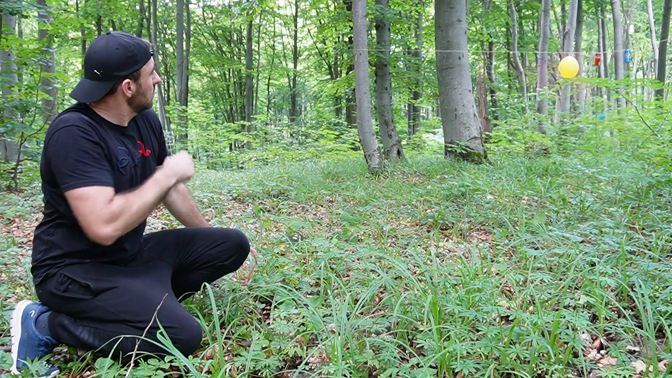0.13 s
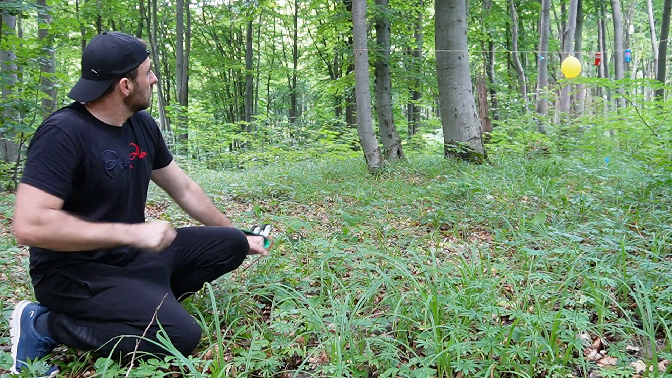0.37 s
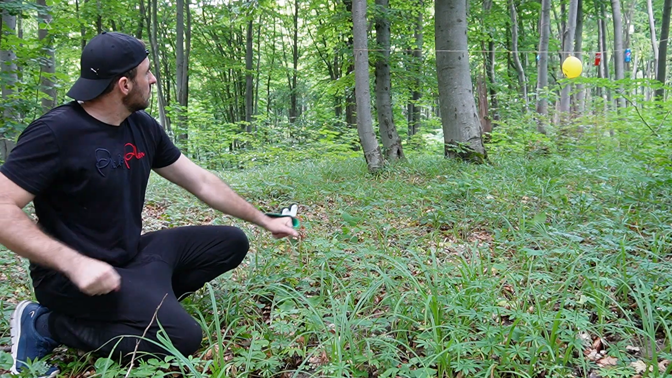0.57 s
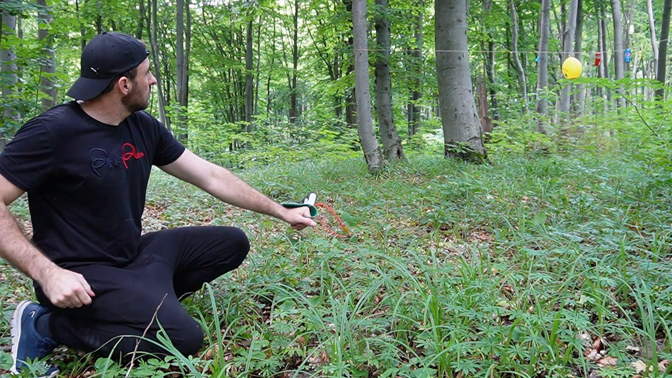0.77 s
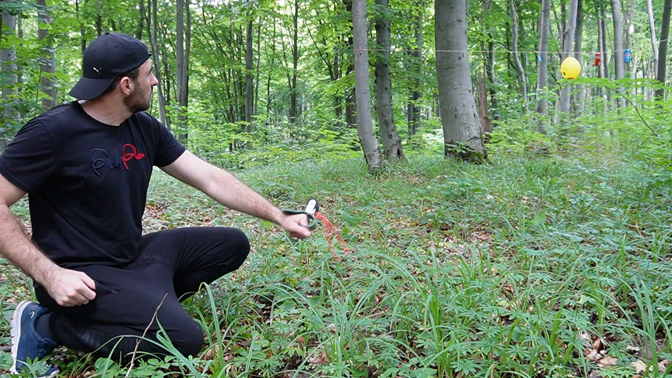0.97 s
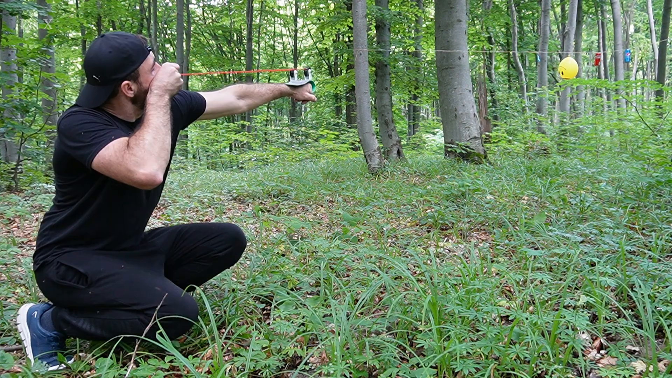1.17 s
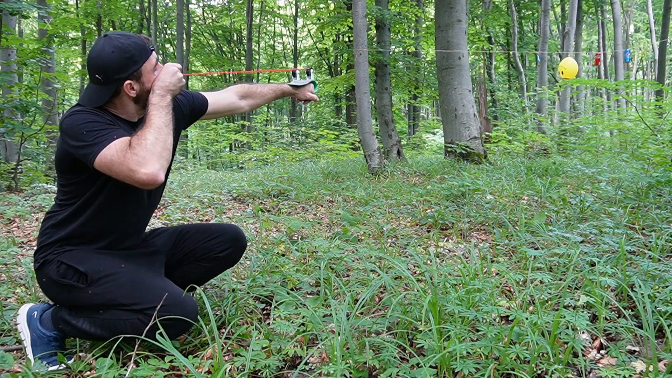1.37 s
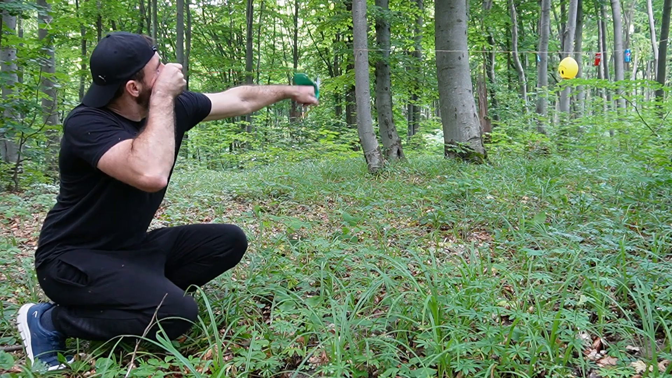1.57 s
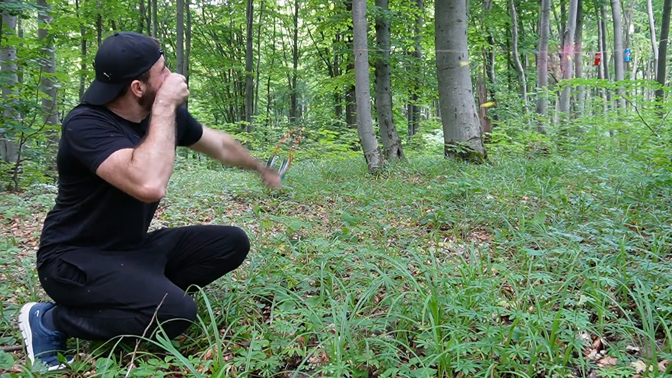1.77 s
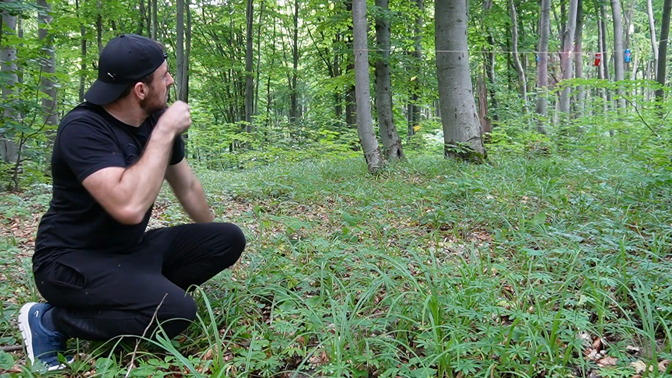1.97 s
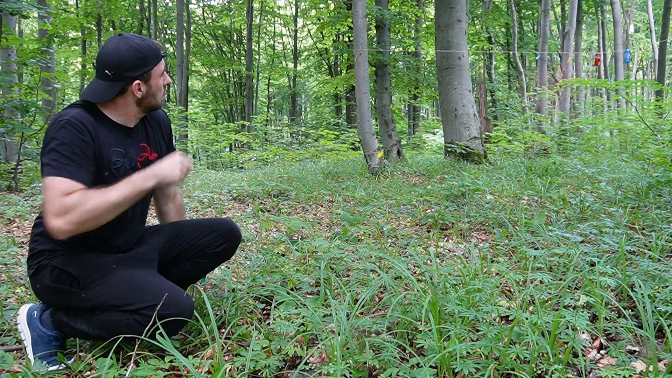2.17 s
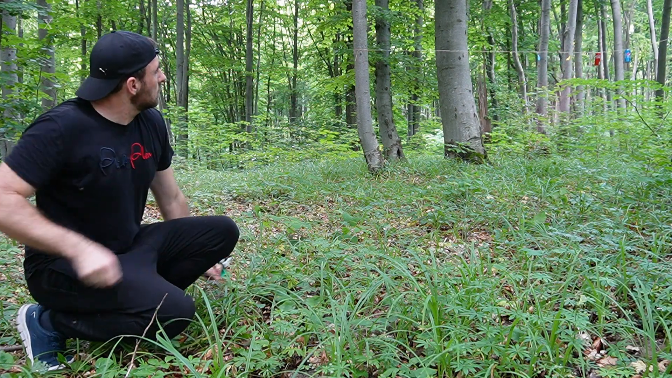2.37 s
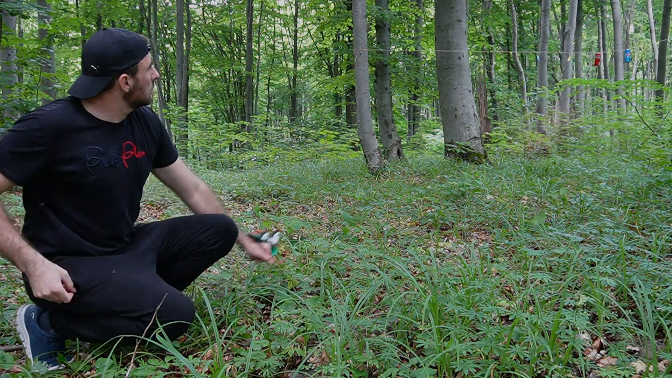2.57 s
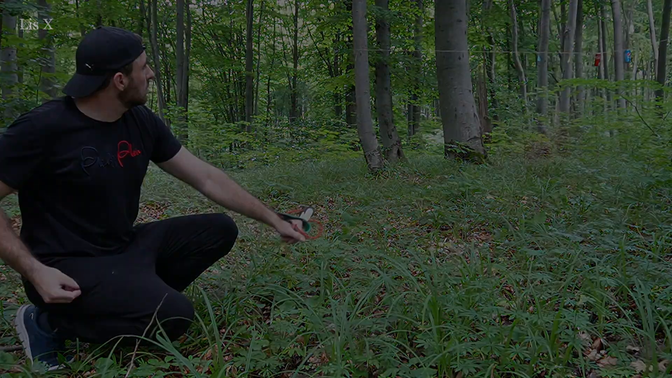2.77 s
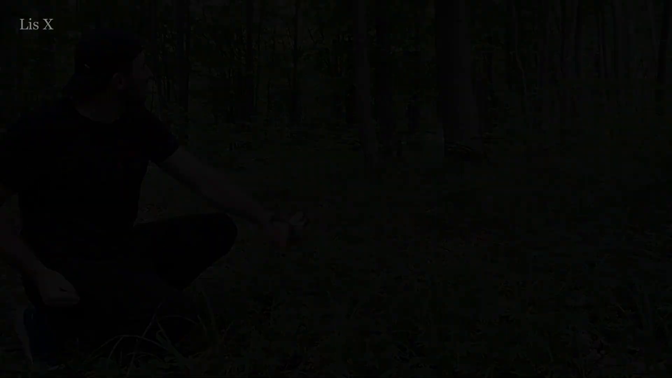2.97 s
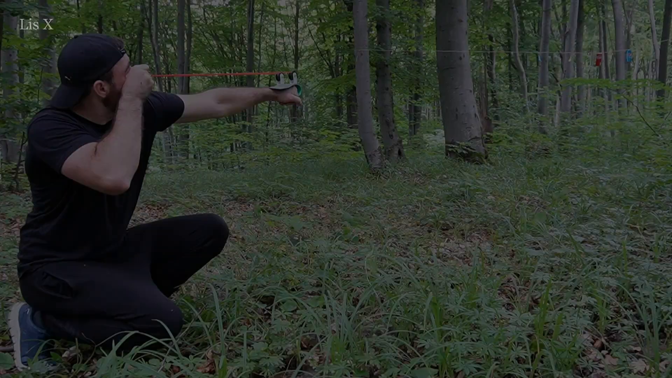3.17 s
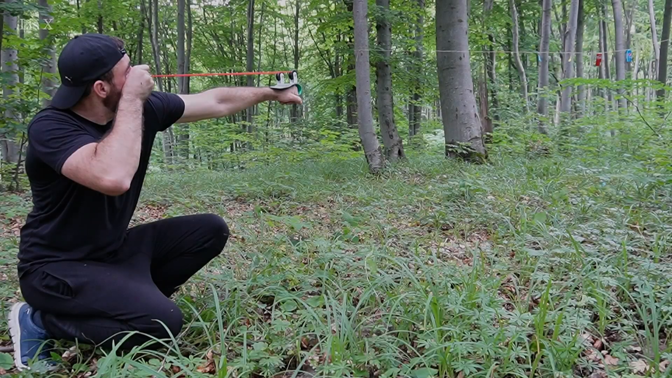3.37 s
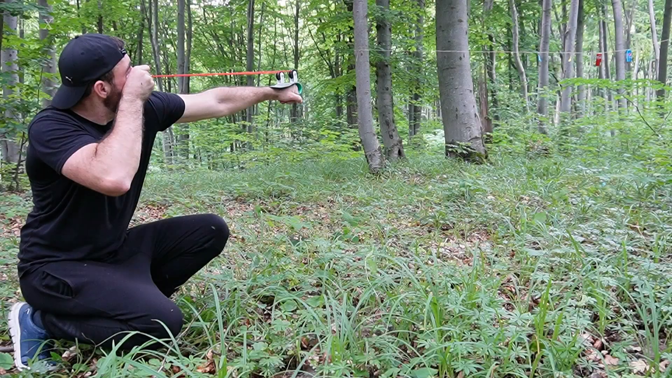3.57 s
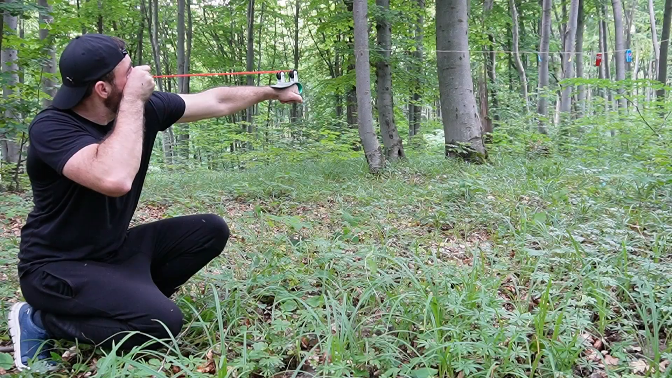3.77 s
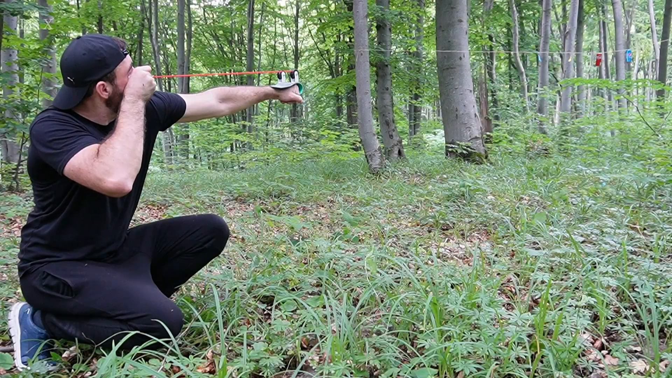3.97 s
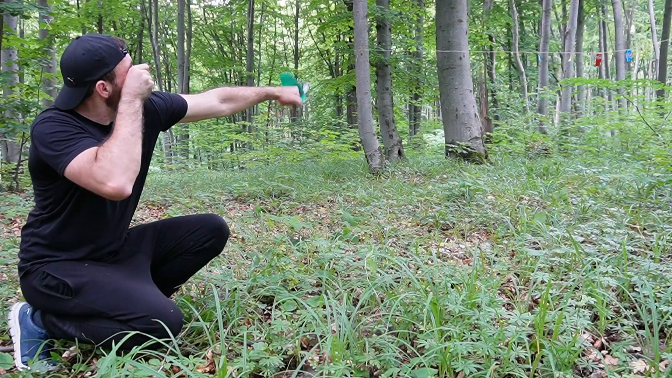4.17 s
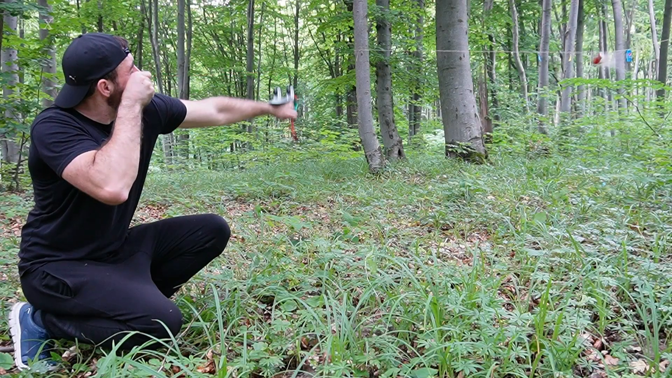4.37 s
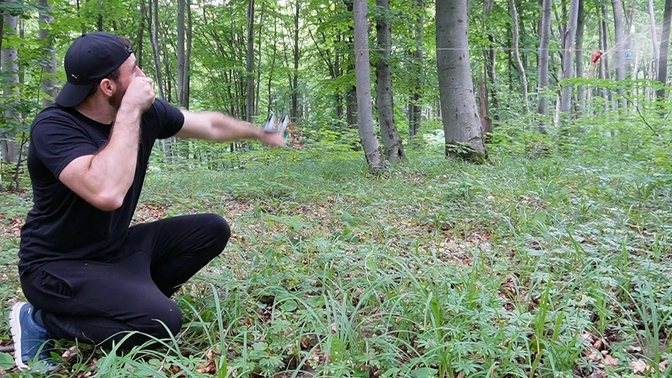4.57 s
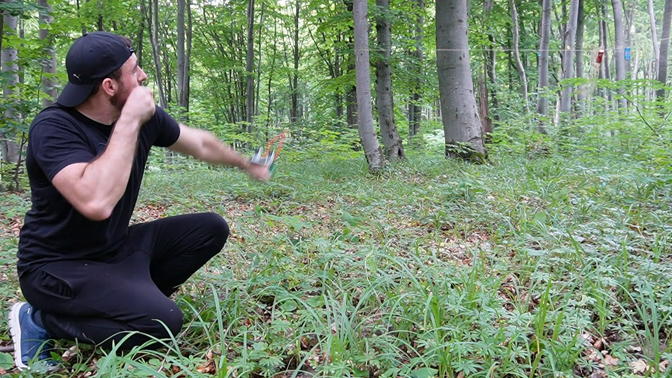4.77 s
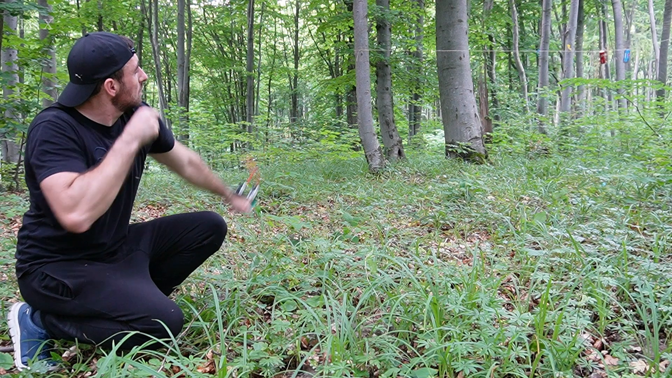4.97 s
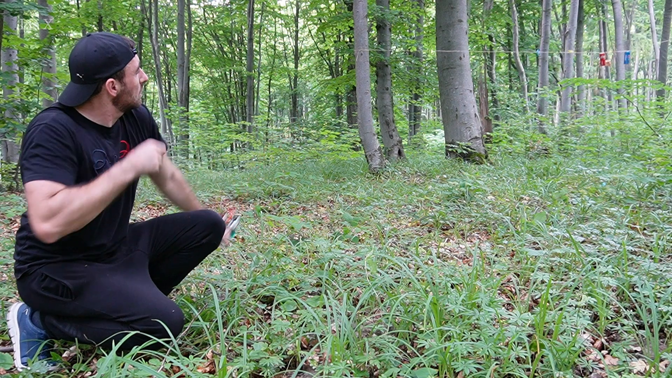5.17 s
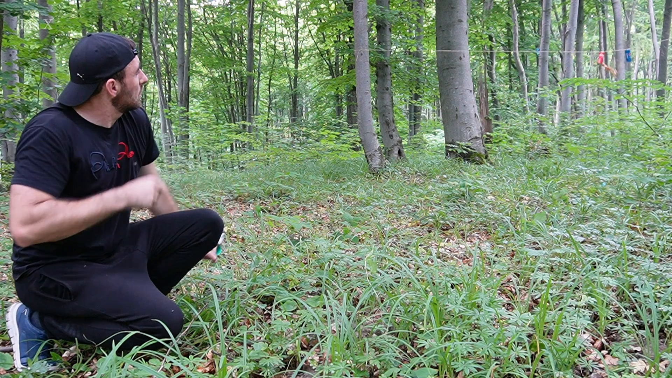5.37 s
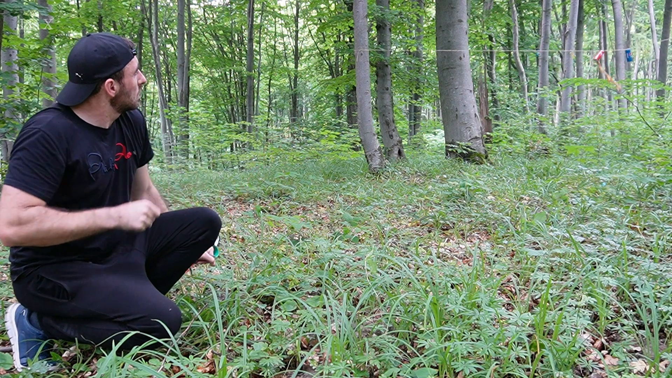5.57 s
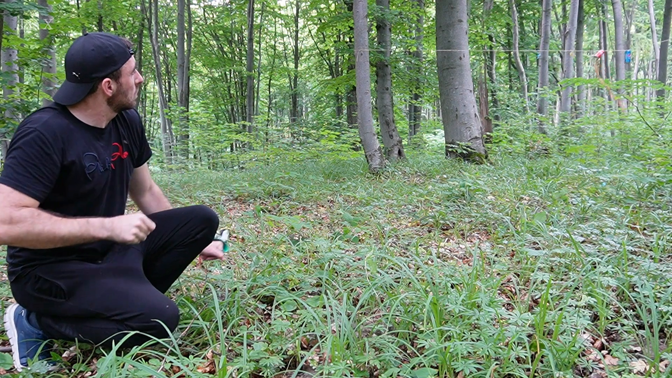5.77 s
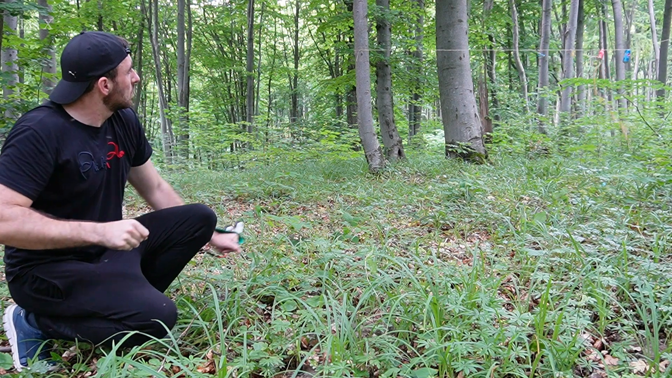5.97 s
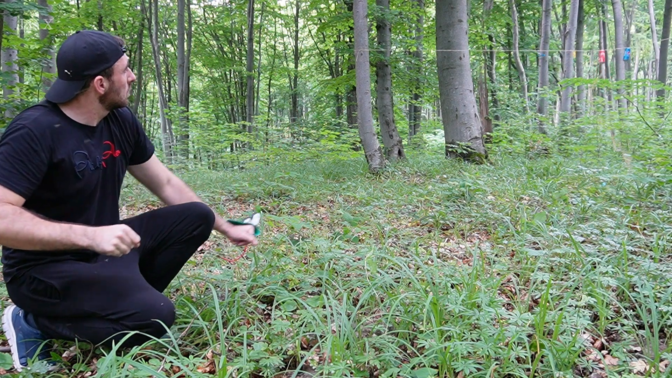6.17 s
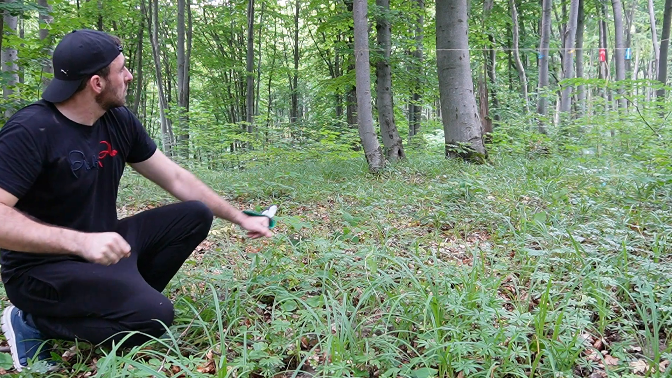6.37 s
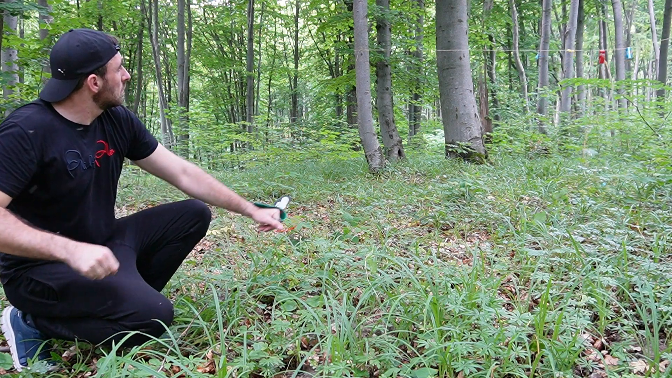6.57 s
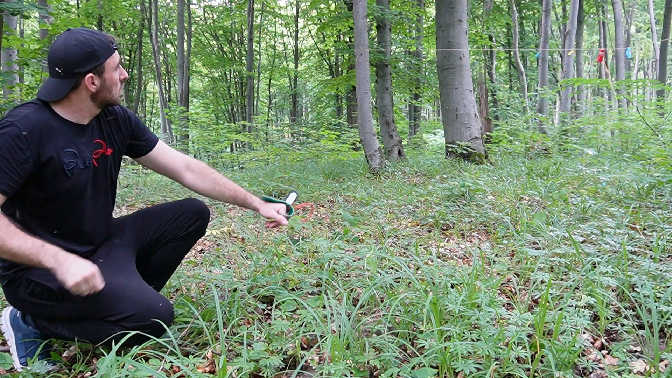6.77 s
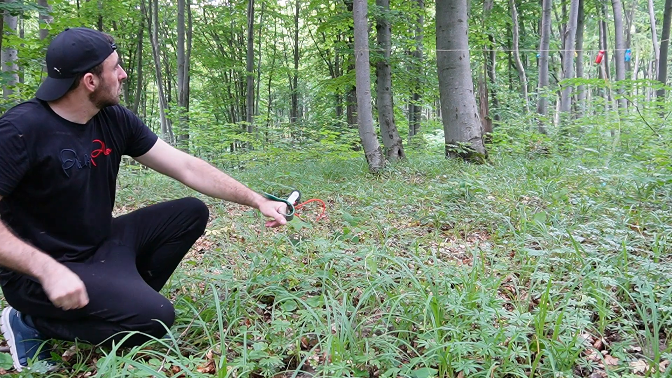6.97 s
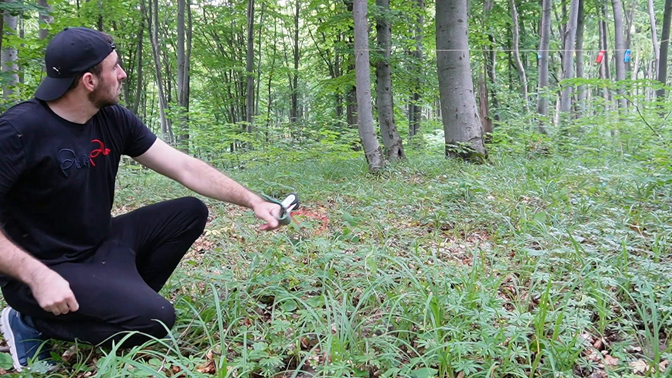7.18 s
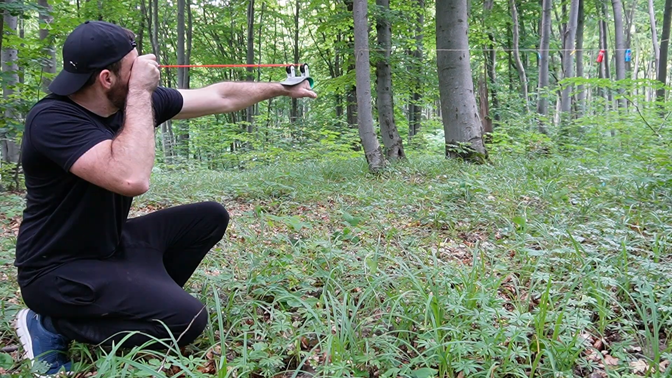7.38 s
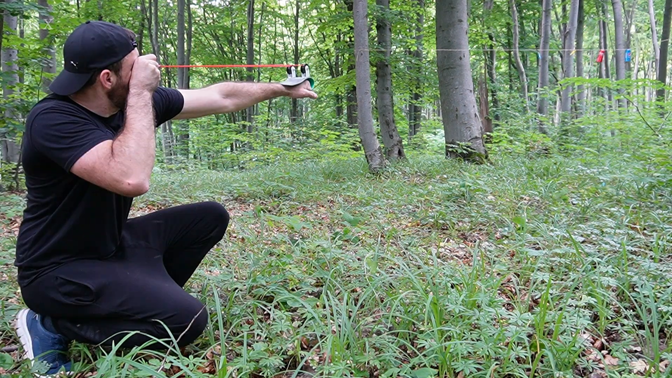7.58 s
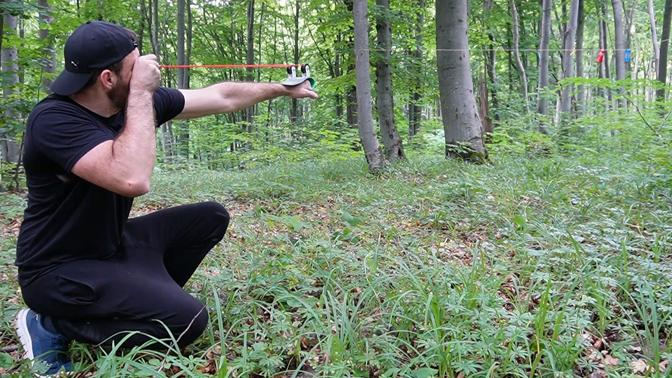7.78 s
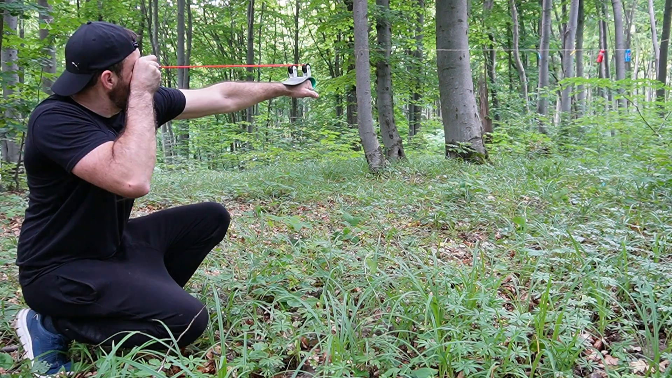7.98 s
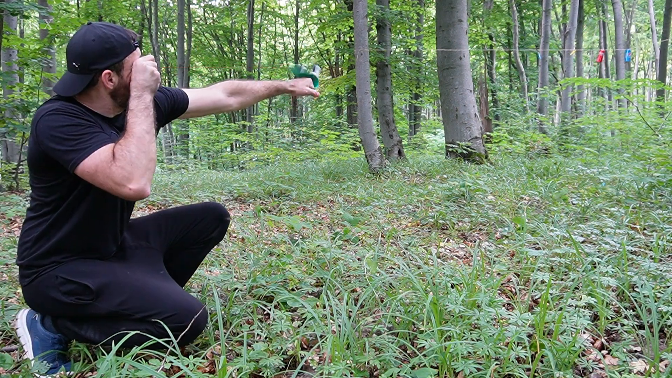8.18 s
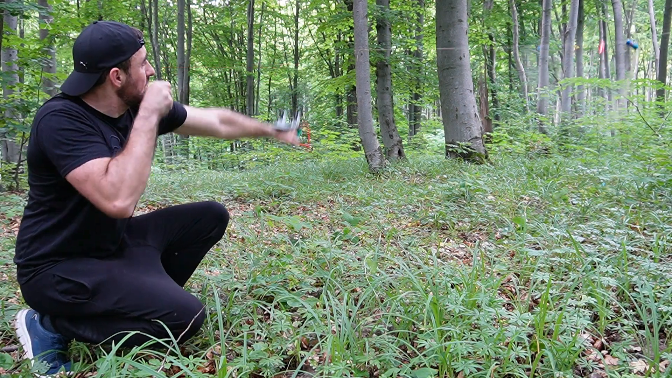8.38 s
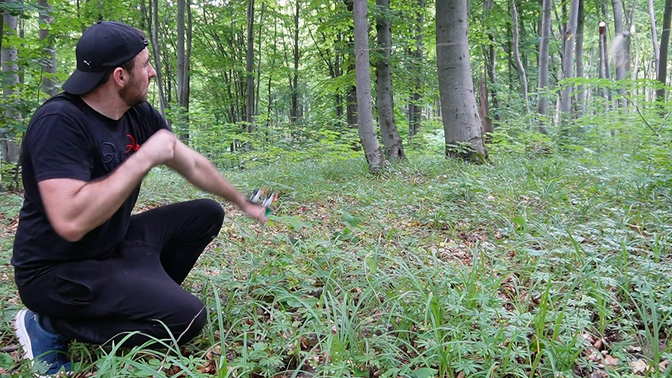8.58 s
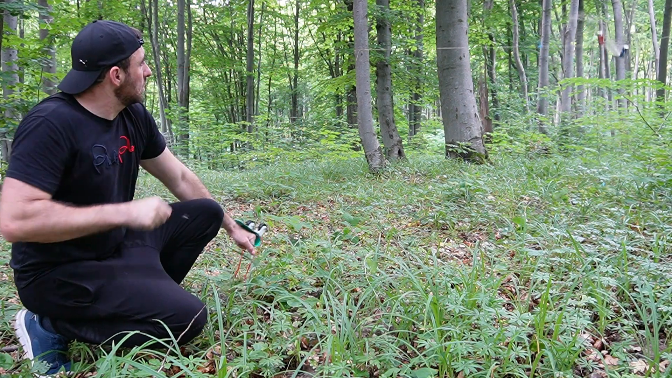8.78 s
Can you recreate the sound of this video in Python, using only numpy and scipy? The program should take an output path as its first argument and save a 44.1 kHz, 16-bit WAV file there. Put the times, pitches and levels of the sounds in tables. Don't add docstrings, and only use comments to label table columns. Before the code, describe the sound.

In an open forest, slingshot rubber flaps and sharp cracks ring out with long woody echoes, one slowed and dull, ending in a metallic can hit.

```python
import sys
import numpy as np
from scipy import signal
from scipy.fft import rfft, irfft, next_fast_len
from scipy.io import wavfile
from scipy.ndimage import uniform_filter1d, minimum_filter1d

SR = 44100
rng = np.random.default_rng(int(sys.argv[2]) if len(sys.argv) > 2 else 0)


def voltage_ratio(decibels):
    exponent = np.asarray(decibels, float) / 20
    return 10 ** exponent


def materialize(psi):
    bounded = np.clip(np.atleast_2d(psi).T, -1, 1)
    quanta = np.round(bounded * 32767).astype(np.int16)
    wavfile.write(sys.argv[1], SR, quanta)


N = 389844
T = np.arange(N) / SR
BLACK_S = 3.036

# start_s, level_db, hold_s, fall_db_per_s
FLAPS = [
    [(1.618, -26, 0.042, 500.5), (1.674, -29.5, 0.0086, 699.5)],
    [(4.176, -26, 0.099, 600.5), (4.177, -24.5, 0.014, 606.5), (4.204, -26, 0.0067, 501),
     (4.221, -24.5, 0.0059, 351.5), (4.258, -26.5, 0.0175, 501.5), (4.283, -29, .007, 1104.5),
     (4.302, -27.5, 0.024, 300.5)],
    [(8.218, -24.5, 0.0045, 900), (8.227, -26.5, 0.013, 350), (8.245, -22, .013, 1500),
     (8.268, -27, 0.0055, 350)],
]
HITS_S = [1.745, 4.516, 8.36]
# start_s, end_s, level_db
CUTS = [
    (0, 1.076, -62.5),
    (1.073, 3.042, -64),
    (3.049, 7.317, -62.5),
    (7.354, 8.84, -59.5),
]


def on_log(table, hz):
    f, v = np.transpose(table)
    return np.interp(np.log(hz + 1), np.log(f), v)


def walk(count, rate):
    k = max(int(SR / rate), 1)
    held = np.repeat(rng.standard_normal(count // k + 1), k)
    return 1.2 * uniform_filter1d(held, k)[:count]


def span(t0, t1):
    return T[int(t0 * SR):int(t1 * SR)]


def decay(t, t60):
    return np.exp(-np.log(1000) * t / t60)


def swells(t, rows, rise_db_s):
    power = 1e-14
    for s, db, hold, fall in rows:
        rise_db = rise_db_s * np.maximum(s - t, 0)
        fall_db = fall * np.maximum(t - s - hold, 0)
        power = power + voltage_ratio(db - rise_db - fall_db) ** 2
    return 10 * np.log10(power)


def fade(t):
    return np.interp(t, [2.65, BLACK_S, 3.6], [1, 0, 1])


def add(out, x, start, pan_db):
    i = int(start * SR)
    mid, side = np.broadcast_to(x, (2, x.shape[-1])) * [[1], [x.ndim - 1]]
    both = np.array([(mid + side) * voltage_ratio(pan_db / 2), (mid - side) * voltage_ratio(-pan_db / 2)])
    out[:, i:i + both.shape[1]] += both[:, :N - i]


def ring(x, hz, width_hz):
    return signal.lfilter(*signal.iirpeak(hz, hz / width_hz, SR), x)


def wash(out, s, db, pan_db, tone, band_hz, tilt_db=0., grain_db=2.5, grain_rate=950.0, flicker_db=1.0,
         wide_db=0., thin_db=0.):
    # freq_hz, side_minus_mid_db
    spread = [(60, -27), (110, -28), (200, -20), (380, -15.5), (700, -15), (1290, -12), (2380, -9),
              (4400, -8), (8120, -3), (15000, -3)]
    thin_hz = 450.3
    t = span(s[0], s[-1])
    size = next_fast_len(len(t))
    hz = np.fft.rfftfreq(size, 1 / SR)
    shape = voltage_ratio(on_log(tone, hz))
    in_band = (hz > band_hz[0]) & (hz < band_hz[1])
    shape = shape / np.sqrt(np.sum(shape[in_band] ** 2) / len(hz))
    grain = voltage_ratio(grain_db * walk(size, grain_rate))
    noise = rng.standard_normal((2, size)) * grain / np.sqrt(np.mean(grain ** 2))
    noise = rfft(noise) * shape * np.array([hz ** 0, voltage_ratio(on_log(spread, hz) + wide_db)])
    x = 0
    tilt_db = np.interp(t, s, tilt_db + 0 * s)
    for centre in 30 * 2 ** np.arange(.5, 9.1, .5):
        window = np.clip(1 - 2 * np.abs(np.log2((hz + 1) / centre)), 0, 1)
        escaped_db = thin_db * (t - t[0]) * max(np.log2(thin_hz / centre), 0)
        slope_db = tilt_db * (centre - band_hz[0] * 2) / 1000 - escaped_db
        x = x + irfft(noise * window, size)[:, :len(t)] * voltage_ratio(slope_db + flicker_db * walk(len(t), 25))
    edge = np.clip(np.minimum(t - s[0], s[-1] - t) / 0.0024, 0, 1)
    level = voltage_ratio(uniform_filter1d(np.interp(t, s, db), size=160))
    add(out, x * edge * level, s[0], np.interp(t, s, pan_db + 0 * s))


def slingshot(out):
    # freq_hz, density_db_per_hz
    flap_tone = [
        [(59, -79), (100, -47.5), (621, -23), (705, -12.5), (1130, -15.5), (1480, -1.5), (1870, -4.5),
         (3860, -3), (6840, -14.5), (14400, -27), (16000, -43.5)],
        [(35, -82.5), (60, -57.5), (267, -11), (361, -15.5), (593, -2), (1000, -1.5), (1450, 1), (2080, -11.5),
         (3490, -17.5), (9220, -48.5), (10500, -64)],
        [(59, -80), (100, -46), (289, -38), (662, -17), (991, -22), (1480, -4), (1680, -4.5), (3780, 0),
         (5080, -5), (6840, -15), (16000, -32)],
    ]
    # freq_hz, density_db_per_hz
    end_tone = [
        [(180, -72.5), (300, -42), (1460, -17), (1930, -2.5), (2360, -16.5), (3190, -7.5), (4230, -7),
         (4670, -14), (10200, -28), (16000, -47)],
        [(59, -75), (100, -45.5), (758, -2), (1010, -11), (1210, -5), (1530, -8), (4200, -25.5), (10500, -63.5)],
        [(180, -73), (300, -41), (1010, -21), (1970, 2), (2570, -9), (3130, -3.5), (5520, -11), (10400, -22),
         (16000, -47)],
    ]
    # start_s, level_db, hold_s, fall_db_per_s
    wobbles = [
        [(1.701, -34, 0.015, 330)],
        [(4.345, -35.5, 0.018, 69.9), (4.436, -35, 0.035, 330)],
        [(8.304, -36.5, 0.016, 150), (8.309, -29, 0.009, 900)],
    ]
    dulling = [10, 3., 9.1]
    slowed = [0.96, 2.3, 0.99]
    lead_s, lead_db, lead_rise_db_s = .02, -13, 754
    rise_db_s, bright_s = 5005, 0.025
    shots = zip(FLAPS, wobbles, HITS_S, slowed, flap_tone, end_tone, dulling)
    for flaps, ends, hit, slow, tone, last_tone, dull_db in shots:
        release, db = flaps[0][:2]
        s = span(release - lead_s * slow, hit)
        lead = swells(s, [(release, db + lead_db, 0, rise_db_s)], lead_rise_db_s / slow)
        loud = np.maximum(lead, swells(s, flaps, rise_db_s))
        tilt_db = -dull_db * (s - release - bright_s * slow)
        last = swells(s, ends, rise_db_s)
        for level_db, colour, tilt in ((loud, tone, tilt_db), (last, last_tone, 0)):
            wash(out, s, level_db, 1.2, colour, (600, 9000), tilt, grain_db=1.5, grain_rate=700. / slow,
                 wide_db=-8.)


def snaps(out, events, low_hz, top_hz):
    t = T[:SR // 10]
    band = signal.butter(3, [low_hz, top_hz], "band", fs=SR, output="sos")
    for s, db, hz, t60, broad_db in events:
        rough = rng.standard_normal(len(t)) * voltage_ratio(2.8 * walk(len(t), 3000.))
        step = 6.5 * (t == 0)
        rattle = (rough + step) * decay(t, max(t60, .002))
        x = signal.sosfilt(band, 3 * ring(rattle, hz, 0.21 * hz) + voltage_ratio(broad_db) * rattle)
        add(out, x * voltage_ratio(db) / np.max(np.abs(x)), s, .5)


def strikes(out):
    # time_s, peak_db, pitch_hz, broad_crack_db
    cracks = [(1.7465, -5, 2010, -7), (8.2185, -9.5, 3070, -11), (8.2492, -12, 3660, -2),
              (8.3605, 3, 3460, -6), (8.752, -32, 3400, -1)]
    # time_s, peak_db, pitch_hz, t60_s, broad_crack_db
    burst = [(1.601, -30, 1400, .012, 0), (1.6182, -11.5, 3503, 0.0099, -2), (1.619, -9, 3200, .016, -5),
             (1.6613, -9.5, 2495, .003, 1), (1.663, -21, 1500, 0.034, -14.5),
             (1.7449, -13, 1094, .005, -7.5), (1.7485, -5, 1053, .01, -1), (1.7508, -8, 2700, 0.011, -2),
             (1.677, -17, 2497, 0.0055, -4), (8.2195, -5.5, 4200, 0.0051, -3),
             (8.2211, -15, 3500, 0.011, 0), (8.2274, -8.5, 3200, .03, -18), (8.252, -17, 4200, .014, -6),
             (8.257, -12, 3000, .006, -1), (8.3625, 1, 3380, 0.026, -9), (8.3611, -22, 1200, 0.028, -20),
             (8.37, -6, 3020, 0.015, -14), (8.383, -18, 1460, 0.061, -25), (8.364, -6, 3400, .012, -5),
             (8.203, -36, 1300, 0.021, -9)]
    # time_s, peak_db, pitch_hz, broad_crack_db
    ticks = [(0.911, -36.5, 5490, -18), (1.6445, -28, 5500, -3), (1.6535, -14.5, 3180, 1),
             (1.6815, -11, 1460, -1), (2.577, -44, 1326, -9), (2.822, -40.5, 3380, -8),
             (8.2701, -4.5, 6500, -3), (8.2822, -15, 3500, -7), (8.679, -29, 3260, 6)]
    # time_s, peak_db, pitch_hz
    slow_cracks = [(4.1758, -19, 1296), (4.5175, -6.5, 1800), (4.521, -6.5, 2370)]
    # time_s, peak_db, pitch_hz
    slow_ticks = [(4.139, -31, 608), (5.065, -17.5, 1386), (5.077, -28, 1170), (5.588, -48, 1654),
                  (6.345, -44, 2010), (6.402, -33, 1500), (6.757, -39, 1910), (6.969, -37, 1890)]
    # time_s, peak_db, pitch_hz, t60_s, broad_crack_db
    slaps = [(4.1802, -20, 3980, .014, -8), (4.186, -19, 5530, 0.0091, -7), (4.221, -18, 1600, 0.0076, -21),
             (4.2385, -26, 4500, 0.011, -11), (4.2448, -17.5, 3300, .01, -15), (4.2495, -18, 3800, .01, 0),
             (4.252, -26.5, 5200, .012, -7.5), (4.27, -20, 3300, .01, -5), (4.2745, -22, 1500, .014, -14),
             (4.301, -12, 3400, 0.0044, -7.5), (4.3273, -18.5, 2500, 0.011, -10),
             (4.3298, -12.5, 2200, 0.0068, 2), (4.3328, -26, 1500, .01, -14),
             (4.5161, -2.5, 2560, 0.0063, -4.5), (4.519, -11, 4800, .03, -5.5),
             (4.525, -8.5, 2500, .015, -8), (4.572, -5, 1420, 0.03, -20.5)]
    # time_s, peak_db, pitch_hz, t60_s, broad_crack_db
    knocks = [(4.3012, -12, 780, .013, -8), (4.436, -27, 1360, .05, -10), (4.454, -18, 1170, .06, -10),
              (6.287, -31, 1420, .04, -8)]
    quick = [(s, db, hz, 0.0099, broad_db) for s, db, hz, broad_db in ticks]
    quick += [(s, db, hz, 0.021, broad_db) for s, db, hz, broad_db in cracks]
    quick += burst
    slow = [(*e, 0.022, -4) for e in slow_ticks] + [(*e, 0.035, 0) for e in slow_cracks]
    snaps(out, [e for e in quick if e[0] < BLACK_S], 440.0, 11500.)
    snaps(out, slow + knocks[:1], 320.0, 3300.)
    snaps(out, slaps, 320., 4500.)
    snaps(out, knocks[1:], 500., 2200.)
    snaps(out, [e for e in quick if e[0] > BLACK_S], 970.0, 10500.0)


def rings(out):
    # time_s, peak_db, pitch_hz, attack_s, t60_s
    resonances = [(1.701, -20, 3880, 0.0028, .03), (1.702, -26, 2000, .003, .03),
                  (1.7085, -23.5, 3620, .003, .025), (1.714, -27, 2050, 0.0043, .03),
                  (1.716, -23, 4000, .002, .025), (1.726, -32, 2080, 0.0051, 0.044),
                  (1.7465, -11, 1050, .002, .009), (1.7472, -6, 2000, .002, .012),
                  (1.748, -8, 2900, .002, .012), (4.517, -7.5, 2000, .002, .035),
                  (4.5175, -17, 4300, .003, .05), (1.796, -11, 2200, 0.0026, 0.017),
                  (1.804, -11, 1444, .002, .014), (1.771, -10, 4530, 0.0018, 0.018),
                  (1.783, -12, 4220, .004, 0.027), (1.8905, -16, 2490, .002, 0.018),
                  (4.184, -14.5, 1646, .004, 0.028), (4.204, -16, 1500, 0.0047, .04),
                  (4.243, -17, 1350, .003, .025), (4.272, -16, 1500, 0.0043, 0.022),
                  (4.284, -18.5, 1055, .004, 0.028), (4.563, -9, 1446, 0.0057, 0.037),
                  (4.585, -12, 1543, .005, .025), (4.684, -18.5, 1303, .003, .03),
                  (4.786, -15, 1130, .001, .012), (4.92, -25, 1280, .003, 0.029),
                  (8.303, -17, 3200, .002, .015), (8.309, -19.5, 2890, .003, .03),
                  (8.314, -20, 3710, 0.0028, 0.022)]
    t = T[:SR // 8]
    for s, db, hz, attack, t60 in resonances:
        push = (1 + 6 * rng.standard_normal(len(t))) * np.sin(2 * np.pi * hz * t)
        swell = np.minimum(t / max(attack, .0005), 1) * decay(np.maximum(t - attack, 0), max(t60, .005))
        x = ring(ring(push, hz, 0.15 * hz) * swell, hz, hz / 2)
        add(out, x * voltage_ratio(db) / np.max(np.abs(x)), s, .3)


def kicks(out):
    # time_s, peak_db, length_s, sign
    pulses = [(1.6613, -9, .0002, -1), (1.6815, -12, .00015, 1), (1.7465, -4, .0002, 1),
              (1.7485, -5, .0003, -1), (1.7495, -6, .0002, 1), (4.2213, -12, .0004, -1),
              (4.301, -9, .0004, 1), (4.33, -10, .0003, 1), (4.5165, -3, .0004, -1),
              (5.0655, -25, .00012, 1), (5.067, -27, .00016, -1), (5.0765, -32, .00012, 1),
              (8.2195, -6, .00015, -1), (8.2567, -12, .00015, -1), (8.3607, -5, .00015, -1),
              (8.3645, -8, .00016, 1), (8.3655, -8, .00016, -1)]
    t = T[:SR // 250] - T[SR // 500]
    for s, db, length, sign in pulses:
        u = (2 * t / length) ** 2
        add(out, sign * voltage_ratio(db) * (1 - u) * np.exp(-u / 2), s + t[0], .3)


def forest(out):
    # start_s, level_db, hold_s, fall_db_per_s
    returns = [
        [(0, -36.5, 0.004, 34), (0, -34.5, 0.00095, 109)],
        [(1.755, -25, 0.12, 44), (1.785, -20.5, 0.014, 300.5)],
        [(4.522, -26, 0.14, 28.5), (4.522, -14, 0.0026, 700), (4.566, -16.5, 0.014, 300.5)],
        [(8.366, -31, 0.034, 34), (8.366, -24, 0.025, 91), (8.366, -21, 0.0021, 700)],
    ]
    ends = [1.07, 3.0, 5.7, 8.84]
    # freq_hz, density_db_per_hz
    tail_tone = [
        [(47, -83), (80, -41), (122, -52), (338, -28), (802, -13.5), (1070, -12), (1630, -1), (2540, -6),
         (5770, -9), (16000, -48.5)],
        [(24, -76), (40, -49.5), (455, -17), (585, -16.5), (733, -14.5), (1480, -3.5), (2150, -0.5),
         (6490, -4.5), (11300, -20.5), (16000, -30)],
        [(24, -100), (40, -72), (209, -26), (264, -21), (597, -14), (720, -10.5), (1410, -3.5), (2500, -6.5),
         (4640, -20), (8130, -43.5), (10500, -64)],
        [(59, -92), (100, -54), (283, -54.5), (1100, -18), (1230, -11.5), (1830, -15.5), (2220, -3.5),
         (2580, -6), (3250, 2.5), (7770, -9.5), (16000, -33)],
    ]
    absorption = [2.9, 4.2, 2.5, 2.5]
    for rows, end, tone, air_db, pan_db in zip(returns, ends, tail_tone, absorption, [.3, .4, -.8, -.2]):
        s = span(rows[0][0], end)
        db = swells(s, rows, 349.5) + 20 * np.log10(fade(s))
        tilt_db = -air_db * (s - s[0] - 0.0525)
        wash(out, s, db, pan_db, tone, (900, 3500), tilt_db, grain_db=0.5, grain_rate=300.,
             wide_db=-1.0, thin_db=9.0)


def can(out):
    # pitch_hz, level_db, t60_s
    modes = [(1238, -19.5, 2.2), (1250, -11, .15), (2283, -8, 0.6), (2772, -10, .8), (3070, -8, 0.4),
             (3278, -5, .3), (5030, -12, .4)]
    spin_hz, spin_depth, facing_s = 20, .7, .057
    t = T[:int(.24 * SR)]
    spin = 1 + spin_depth * np.cos(2 * np.pi * spin_hz * (t - facing_s))
    x = 0
    for hz, db, t60 in modes:
        beating = voltage_ratio(db + 2.5 * walk(len(t), 49.5))
        x = x + beating * np.sin(2 * np.pi * hz * t) * decay(t, t60)
    edge = np.clip(np.minimum(t / 0.0031, (t[-1] - t) / 0.018), 0, 1)
    add(out, voltage_ratio(-22) * x * spin * edge, 8.361, -1.)


def spray(out):
    # time_s, level_db, brightness_db_per_khz, left_minus_right_db
    jet = [(5.3, -42, -0.5, 12), (5.69, -51, 0.5, 0), (6.6, -47, 1, -2.5), (7.32, -52, 1, -0.5)]
    # freq_hz, density_db_per_hz
    jet_tone = [(24, -64), (40, -45), (134, -31), (235, -19), (297, -12.5), (402, -8.5), (656, -5.5),
                (1320, 0), (1920, 0.5), (4230, -16), (7070, -37), (8920, -49), (10500, -58)]
    s, db, tilt_db, pan_db = np.transpose(jet)
    swell_db = -12 * np.clip((5.7 - s) / 0.36, 0, 1)
    wash(out, s, db + swell_db, pan_db, jet_tone, (700, 3000), tilt_db, grain_db=.4, grain_rate=90.,
         flicker_db=.6)


def leaves(out):
    # start_s, level_db, hold_s, fall_db_per_s
    rustles = [(0.912, -67, .16, 900), (2.827, -71, .01, 93), (8.747, -39.5, .005, 153)]
    # freq_hz, density_db_per_hz
    leaf_tone = [(1180, -43), (2000, -18), (3740, -4.5), (4530, -6), (5350, -5.5), (6470, -8), (14300, -26),
                 (16000, -35)]
    for row in rustles:
        s = span(row[0], row[0] + .2)
        wash(out, s, swells(s, [row], 0), 0, leaf_tone, (6200, 10000), grain_db=1.0)


def birds(out):
    # start_s, length_s, start_hz, held_hz, level_db
    whistles = [(.45, 0.1, 6900, 4590, -54.5), (0.498, 0.058, 4700, 4000, -53.5),
                (0.561, 0.21, 4600, 4550, -67), (.775, 0.045, 6800, 5510, -59),
                (.815, .15, 5510, 5510, -62), (.82, .095, 5010, 3840, -61), (.962, .085, 5400, 5100, -67)]
    song = np.zeros((2, N))
    for s, length, start_hz, hz, db in whistles:
        t = T[:int(length * SR)]
        glide = np.clip(1 - t / .015, 0, 1) ** 1.3
        pitch = hz * (1 + .008 * walk(len(t), 250)) + (start_hz - hz) * glide
        level = voltage_ratio(db + glide - 4 * t / length + 2.2 * walk(len(t), 100))
        tone = np.sin(2 * np.pi * np.cumsum(pitch) / SR)
        add(song, level * tone * signal.windows.tukey(len(t), .08), s, 0)
    far = trill(np.zeros((2, N)))
    echo = rng.standard_normal((2, SR)) * decay(T[:SR], .5)
    echo = echo / np.sqrt(np.sum(echo[0] ** 2)) * [[1], [.55]]
    wet = signal.fftconvolve([voltage_ratio(-3.5) * song[0] + far], echo, axes=1)[:, :N]
    heard = (T < CUTS[0][1]) | (T > CUTS[3][0])
    add(out, (wet + [song[0] + 0.73 * far, 0 * far]) * heard, 0, 1.2)


def trill(far):
    # start_s, loudest_s, level_db, centre_hz, sweep_width_hz
    phrases = [(7.351, 7.354, -58.5, 5170, 1805), (7.5, 7.821, -51.5, 4134, 995),
               (7.921, 7.95, -53, 3650, 1900), (8.04, 8.046, -50, 3486, 1770),
               (8.143, 8.156, -49, 3500, 1900), (7.9, 8.001, -57.5, 4350, 700),
               (7.98, 8.18, -64, 5000, 900)]
    for start, loudest, db, hz, width_hz in phrases:
        t = span(start, HITS_S[-1])
        stroke = np.cumsum(45 * (1 + 0.16 * walk(len(t), 30))) / SR % 1
        sag_hz = 700 * (t - loudest) * (t > loudest)
        pitch = hz - sag_hz + width_hz * (.5 - stroke)
        swell_db = swells(t, [(loudest, db, 0, 58)], 33)
        level = voltage_ratio(swell_db + 4.0 + 2.0 * walk(len(t), 25))
        tone = np.sin(2 * np.pi * np.cumsum(pitch) / SR)
        add(far, tone * np.sin(np.pi * stroke) ** 0.32 * level, start, 0)
    return far[0]


def bee(out):
    # start_s, end_s, wing_hz_at_start, wing_hz_at_end, level_db
    passes = [(1.08, 1.42, 131.8, 138, -83.5), (1.441, 1.607, 137, 140, -78),
              (2.099, 2.598, 111.5, 108, -81.5)]
    for t0, t1, start_hz, end_hz, db in passes:
        t = span(t0, t1)
        phase = 2 * np.pi * np.cumsum(np.interp(t, [t0, t1], [start_hz, end_hz])) / SR
        drone = np.sin(phase) + 0.59 * np.sin(2 * phase)
        add(out, drone * voltage_ratio(db) * signal.windows.tukey(len(t), .4), t0, 0)


def rumble(out):
    # start_s, level_db, hold_s, fall_db_per_s
    drone = (1.074, -68, 0, 19)
    # freq_hz, density_db_per_hz
    drone_tone = [(100, -30), (180, -16), (270, -0.5), (400, -11), (700, -1), (1100, -3), (2500, -44)]
    s = span(drone[0], FLAPS[0][0][0])
    wash(out, s, swells(s, [drone], 0), 1., drone_tone, (200, 800), flicker_db=3.5)


def still():
    # freq_hz, density_db_per_hz
    air_tone = [
        [(18, -73), (30, -43), (364, -14.5), (449, -13), (1810, 1), (2830, -7.5), (4650, -1.5), (6550, -13.5),
         (16000, -28)],
        [(18, -62), (30, -31.5), (134, -10.5), (189, -16), (273, -10.5), (540, -12.5), (913, 2.5), (1280, -3),
         (1590, -1), (2900, -8.5), (14400, -25.5), (16000, -28)],
        [(18, -56.5), (30, -34.5), (167, -25), (384, -8), (762, -14.5), (1240, -20.5), (1630, -23),
         (5830, -35.5), (8840, -36.5), (10500, -61.5)],
        [(18, -57.5), (30, -25), (49, -43), (150, -28), (295, -30.5), (866, -14), (2610, -16), (3980, -5.5),
         (6210, -25), (16000, -39.5)],
    ]
    air = np.zeros((2, N))
    for (t0, t1, db), tone in zip(CUTS, air_tone):
        wash(air, np.array([t0, t1]), np.array([db, db]), 1.0, tone, (30, 16000), grain_db=0.5,
             grain_rate=22.0, wide_db=4.5)
    slow = (T > CUTS[2][0]) & (T < CUTS[2][1])
    whine = ring(rng.standard_normal(N), 8651, 6.)
    air += slow * whine * voltage_ratio(-87) / np.std(whine)
    return air


def scene():
    out = still() * fade(T)
    for source in (slingshot, strikes, rings, kicks, forest, can, spray, leaves, birds, bee, rumble):
        source(out)
    return out


def low_pass(x):
    return signal.sosfilt(signal.butter(12, 16500, fs=SR, output="sos"), x)


def record(dry):
    gain = np.minimum(.88 / (np.abs(dry).max(0) + 1e-9), 1)
    dry = dry * uniform_filter1d(minimum_filter1d(gain, size=257), size=129)
    slow = (T > CUTS[2][0]) & (T < CUTS[3][0])
    dull = signal.sosfilt(signal.ellip(8, .3, 80, 9800, fs=SR, output="sos"), dry)
    full = signal.sosfilt(signal.ellip(8, .3, 80, 15900, fs=SR, output="sos"), dry)
    dither = voltage_ratio(-99.0) * rng.standard_normal(dry.shape)
    return low_pass(np.where(slow, dull, full) + dither)


dry = scene()
out = record(dry)
materialize(out)
```